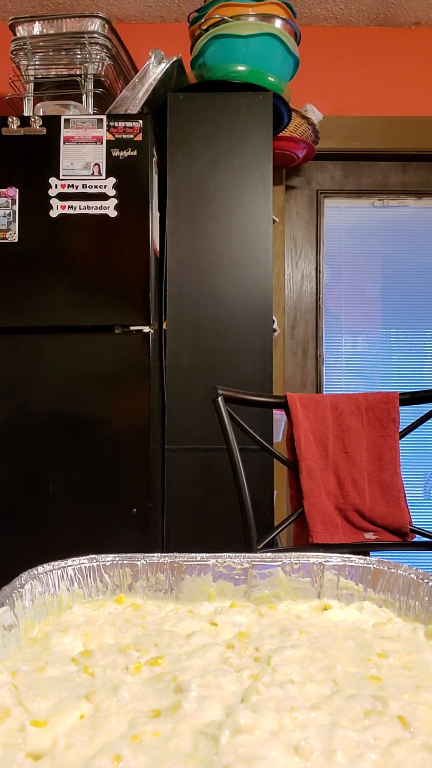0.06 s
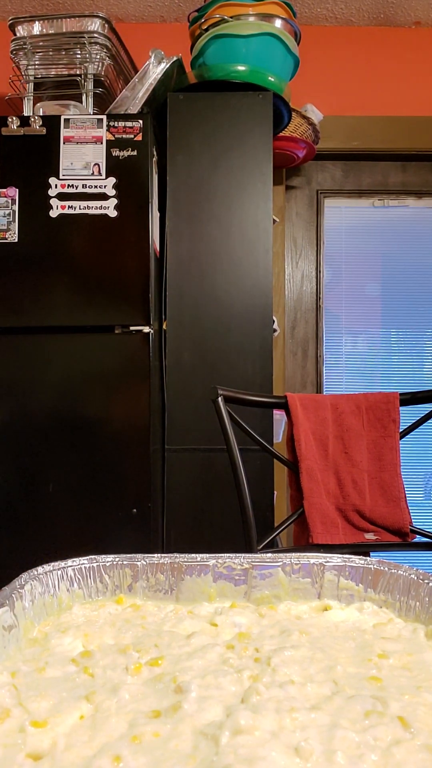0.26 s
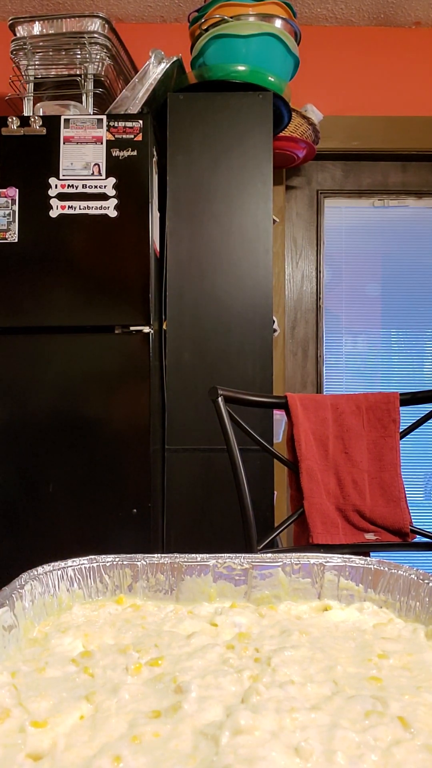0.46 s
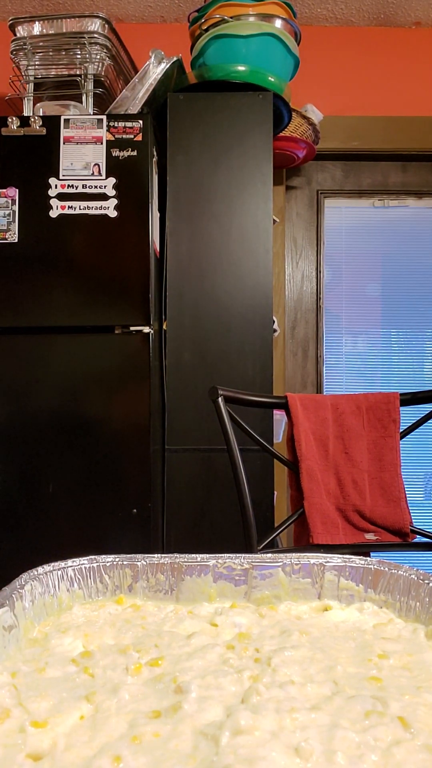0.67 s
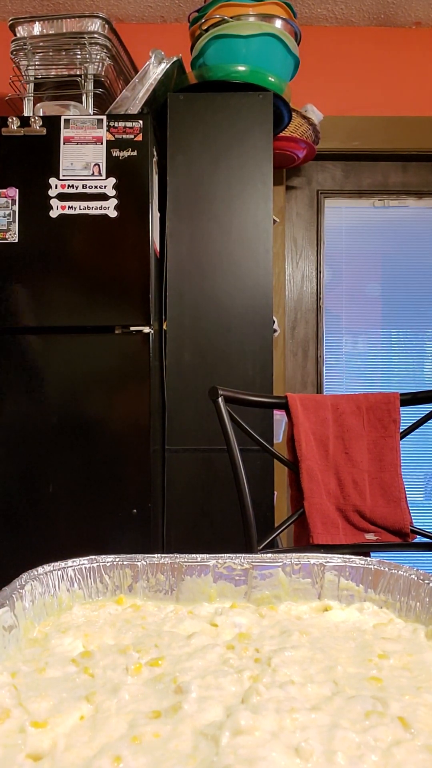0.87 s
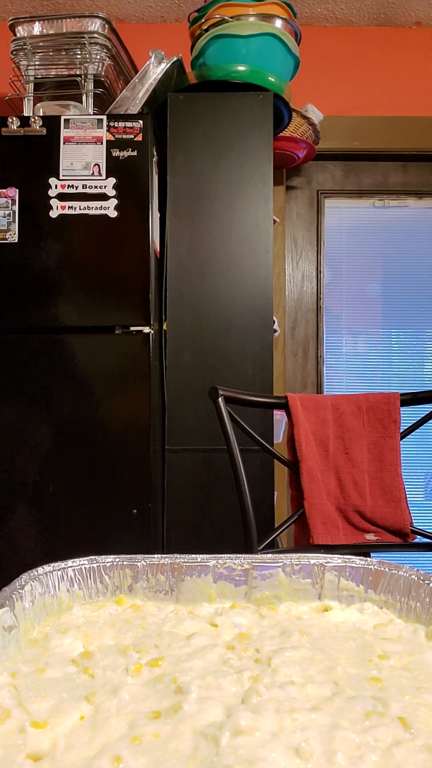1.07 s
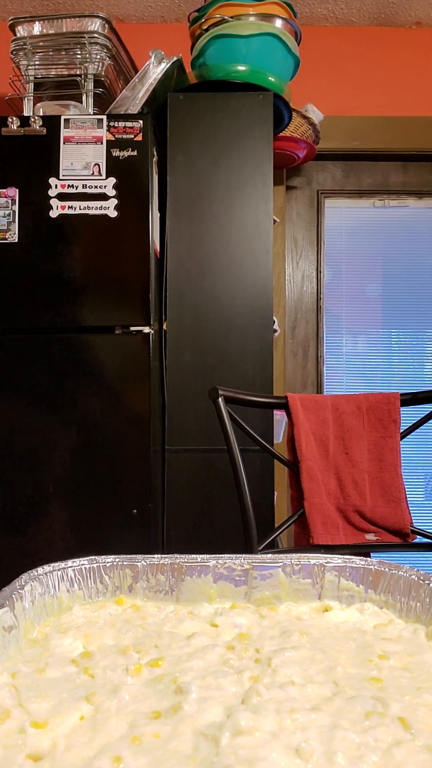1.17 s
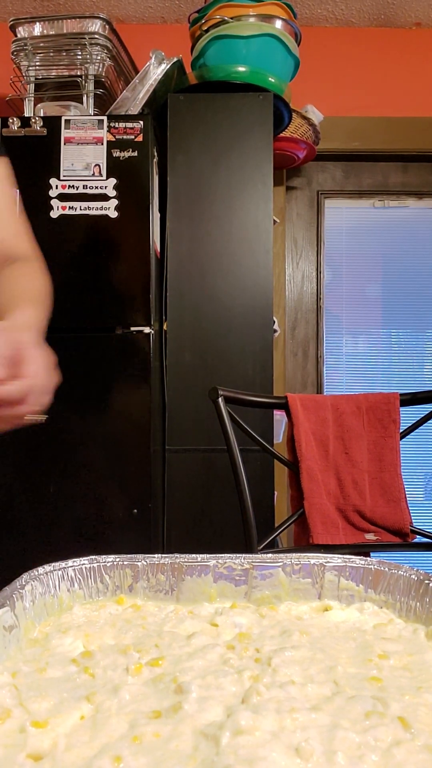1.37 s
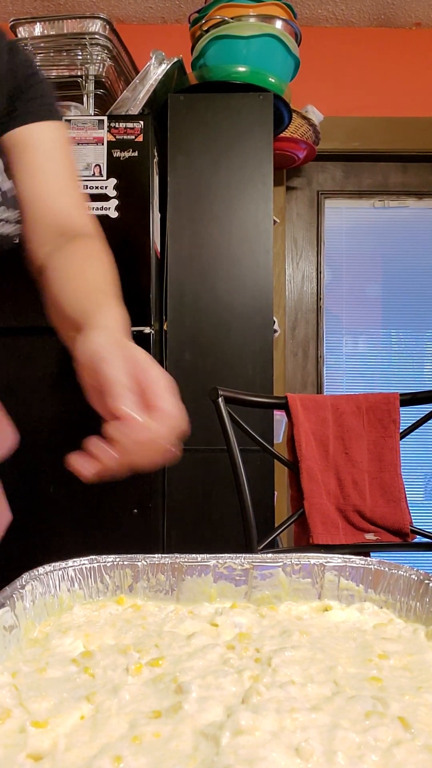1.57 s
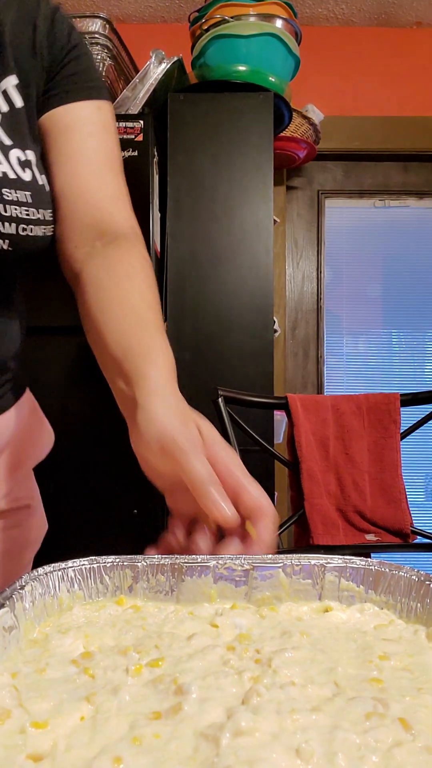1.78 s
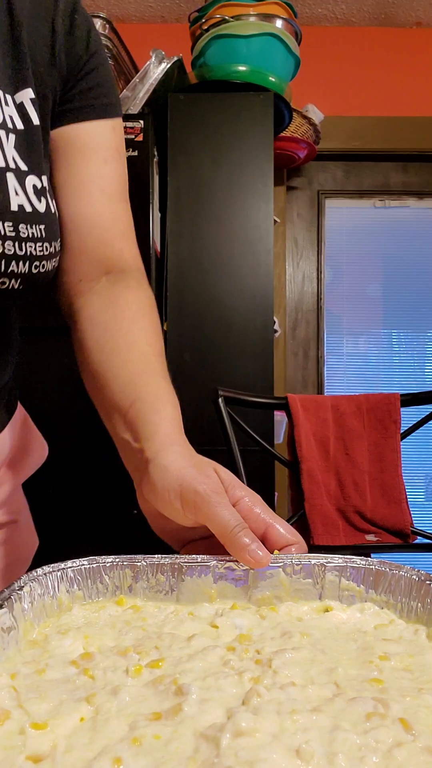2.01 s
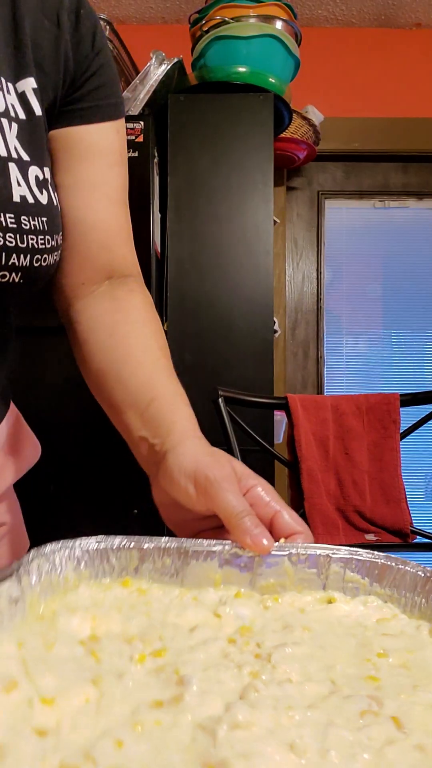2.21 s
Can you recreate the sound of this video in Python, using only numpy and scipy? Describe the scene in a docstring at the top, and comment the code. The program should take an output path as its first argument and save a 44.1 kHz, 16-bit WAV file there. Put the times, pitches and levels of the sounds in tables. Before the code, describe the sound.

A foil pan is set down with a loud crinkling clatter, then soft footsteps and finger taps

```python
"""Still kitchen air (coloured diffuse noise) and a brush of cloth (swelling grains) open the scene.
A foil pan is put down and shifted: blows ring its modes, creases snap in runs, rim and base scrape
and rumble as noise strokes, and metal clinks as decaying sines. Someone then walks up: soles tick and scuff
as contacts and grains, the floor thuds as gliding sines with rumble, and clothes rustle again.
Last, fingers rub (grains) and tap (pushes with rough tails) close to the two microphones."""
import sys
import numpy as np
from scipy import signal
from scipy.fft import rfft, irfft
from scipy.io import wavfile
from scipy.ndimage import uniform_filter1d

SR = 44100
rng = np.random.default_rng(int(sys.argv[2]) if len(sys.argv) > 2 else 0)


def output_pcm(signal):
    """Save a mono or channel-first signal as 16-bit PCM at the path in sys.argv[1].

    Samples are clipped to [-1, 1] before scaling.
    """
    pcm = np.clip(np.atleast_2d(signal).T, -1, 1) * 32767
    wavfile.write(sys.argv[1], SR, np.round(pcm).astype(np.int16))


N = 99225
TOP_HZ = 15900
STOP_SHAPE = 1.4  # exponent of a stroke's fall

# spectrum of a sole on the floor: f/Hz, level/dB
SOLE_SPECTRUM = [(50, -17), (200, -3), (450, -0.5), (900, -9), (2000, -14.5), (4000, -26.5), (8000, -51),
                 (16000, -50)]


def amp(db):
    """Decibels to gain."""
    return 10 ** (np.asarray(db) / 20)


def unit(x):
    """Scale to rms 1."""
    return x / np.sqrt(np.mean(x ** 2))


def along(table, hz):
    """Read a table on a log-frequency axis."""
    f, v = np.array(table).T
    return np.interp(np.log(hz + 1), np.log(f), v)


def bins():
    """Frequencies of the padded transform in Hz."""
    return np.fft.rfftfreq(2 * N, 1 / SR)


def colour(x, table, tilt_db_per_octave=0):
    """Minimum-phase filter of unit energy with the table's spectrum, tilted."""
    octaves = np.log2(np.clip(bins(), 500, TOP_HZ))
    gain = unit(amp(along(table, bins()) + tilt_db_per_octave * octaves))
    # fold the cepstrum to make the filter causal
    cepstrum = irfft(np.log(gain))
    cepstrum[1:N] *= 2
    cepstrum[N + 1:] = 0
    return irfft(rfft(x, 2 * N) * np.exp(rfft(cepstrum)))[..., :N]


def swell(start_s, rise_s, decay_s, shape=1):
    """Straight rise, then a fall: exponential for shape 1, stopping more firmly above that."""
    t = np.arange(N) / SR - start_s
    rise = np.clip(t / rise_s, 0, 1)
    return rise * np.exp(-(np.maximum(t - rise_s, 0) / decay_s) ** shape)


def strokes(table):
    """Level over time of a series of sliding movements."""
    return sum(amp(db) * swell(s, rise, decay, STOP_SHAPE) for s, db, rise, decay in table)


def grains(per_s, spread_db):
    """Random tiny snaps of uneven size, evened to a steady local level."""
    signs = (rng.random(N) < per_s / SR) * rng.choice([-1, 1], N)
    snaps = signs * amp(spread_db * np.minimum(rng.exponential(size=N), 4))
    power = np.abs(uniform_filter1d(snaps ** 2, size=500))
    return snaps / np.sqrt(power + 1e-6)


def crack(start_s, decay_s):
    """A brief rough contact: decaying random signs."""
    return swell(start_s, 1 / SR, decay_s) * rng.choice([-1, 1], N)


def touch(start_s, decay_s):
    """A clean push of a finger or sole, trailed by a little roughness."""
    rough_db = -3
    push = signal.unit_impulse(N, int(start_s * SR))
    # the push has about the energy of the full crack
    return np.sqrt(decay_s * SR / 2) * push + amp(rough_db) * crack(start_s, decay_s)


def ring(x, modes):
    """Excite decaying modes; the response has unit energy."""
    t = np.arange(SR) / SR
    response = sum(amp(db) * np.sin(2 * np.pi * hz * t) * np.exp(-np.log(1000) * t / t60)
                   for hz, db, t60 in modes)
    return signal.fftconvolve(x, response / np.linalg.norm(response))[:N]


def pan_lr(x, db):
    """Spread a sound over two channels, left minus right in dB."""
    return x * amp(np.array([[db], [-db]]) / 2)


def diffuse():
    """Noise from all sides: mid and side shares set the likeness of the two microphones."""
    # likeness of the two microphones: f/Hz, correlation
    likeness = [(60, 0.89), (290, 0.94), (640, 0.27), (1300, -0.41), (2200, 0.018), (3100, 0.025),
                (6000, -0.27)]
    c = np.clip(along(likeness, bins()), -.98, .98)
    noise = rfft(rng.standard_normal((2, N)), 2 * N)
    mid, side = noise * np.sqrt([(1 + c) / 2, (1 - c) / 2])
    return irfft(np.array([mid + side, mid - side]))[:, :N]


def room(x):
    """A weak direct path, dense early reflections and a short tail, even in colour."""
    # reverberation: f/Hz, t60/s
    room_t60 = [(100, .37), (600, .33), (3000, .25), (8000, .2), (16000, .185)]
    early_s, early_db = 0.0067, 7
    direct_db, right_lag_s = -8.5, .00038  # direct path relative to the unit-energy reflections
    hz, t, noise = signal.stft(diffuse(), SR, nperseg=256)
    fall = np.exp(-np.log(1000) * t / along(room_t60, hz)[:, None])
    fall = fall * (1 + amp(early_db) * np.exp(-t / early_s))
    paths = signal.istft(noise * fall, SR)[1][:, :SR]
    paths /= np.linalg.norm(paths, axis=1, keepdims=True)
    paths[0, 0] += amp(direct_db)
    paths[1, int(right_lag_s * SR)] += amp(direct_db)
    response = rfft(paths)
    response /= np.sqrt(uniform_filter1d(np.mean(abs(response) ** 2, axis=0), size=90))
    return signal.fftconvolve(x[None], irfft(response)[:, :SR // 2], axes=1)[:, :N]


def still_air():
    """Steady diffuse noise with the colour of the quiet kitchen."""
    # spectrum of the air: f/Hz, level/dB
    air_spectrum = [(25, -10.5), (52, 2), (100, -10), (240, -13), (550, -16.5), (1000, -29), (2500, -24),
                    (4000, -25.5), (7500, -33), (11000, -29), (15500, -28.5)]
    air_db = -66
    return amp(air_db) * colour(diffuse(), air_spectrum)


def clothes():
    """Fabric brushes: dense fibre snaps swell and stop."""
    # brushes: t/s, level/dB, rise/s, decay/s
    rustles = [(-0.02, -53.5, 0.014, 0.057), (1.01, -61.5, 0.025, .1), (1.124, -56, 0.044, 0.076),
               (1.20, -48.5, 0.027, 0.05), (1.29, -59.5, 0.016, 0.32), (1.569, -47.5, 0.024, 0.069),
               (1.70, -53.5, 0.034, 0.069), (1.888, -52, 0.021, 0.12), (1.999, -46.5, 0.044, 0.078),
               (2.11, -46, 0.046, 0.056)]
    # spectrum of the cloth: f/Hz, level/dB
    cloth_spectrum = [(100, 3), (600, -0.5), (1800, 3), (3000, 0.5), (5000, -4.5), (7500, -15.5),
                      (11000, -10.5), (13500, -9), (15500, -1.5)]
    fibres_per_s, spread_db, side_db = 5600, -1.5, 2
    fibres = strokes(rustles) * grains(fibres_per_s, spread_db)
    return pan_lr(room(colour(fibres, cloth_spectrum)), side_db)


def blow(start_s):
    """One hard push and a brief rattle of the sheet."""
    push_db, rattle_db, rattle_decay_s = 20, -6, 0.0085
    push = amp(push_db) * signal.unit_impulse(N, int(start_s * SR))
    return push + amp(rattle_db) * crack(start_s, rattle_decay_s)


def foil_pan(place, count):
    """One part of the pan: its share of blows rings the body, creases snap in runs, the rim scrapes."""
    # blows: t/s, level/dB
    knocks = [(0.2205, -30.5), (0.2254, -12), (0.2305, -10.5), (0.242, -7.5), (0.246, -24), (0.260, -14),
              (0.290, -18), (0.304, -24), (0.346, -15.5), (0.353, -12.5), (0.368, -16), (0.379, -16),
              (0.408, -18.5), (0.445, -36), (0.481, -22.5), (0.662, -27), (0.692, -32.5), (0.711, -24),
              (0.785, -31.5)]
    # spectrum of a blow: f/Hz, level/dB
    knock_spectrum = [(40, -33.5), (90, -11.5), (150, -0.5), (250, -2), (335, -7.5), (430, 1), (540, -7.5),
                      (640, 3), (770, 0), (950, -9.5), (1500, -7), (2600, -10), (4000, -17.5),
                      (7500, -27.5), (16000, -23)]
    # modes of the pan: f/Hz, level/dB, t60/s
    pan_modes = [(150, -3, .15), (188, -2, .2), (232, -3, .38), (305, -2, .25), (375, -2, .2),
                 (424, -1, .25), (593, -2, .4), (654, -1, .22), (718, 1, .22), (784, 0, .22),
                 (1118, -7, .25), (1683, -7, .18), (2057, -5, .22), (2954, -7, .2)]
    # runs of buckling creases: t/s, level/dB, rise/s, decay/s, tilt/(dB/octave)
    crinkles = [(0.222, -18.5, .004, 0.038, 2.5), (0.296, -14.5, .007, 0.024, 1.5),
                (0.435, -27, 0.0043, 0.052, -1.5), (0.453, -21.5, .018, 0.046, 1),
                (0.526, -29, 0.044, 0.1, 2), (0.656, -41.5, .008, 0.12, -1),
                (0.6873, -14.5, .001, 0.019, 3.5), (0.698, -28.5, .01, 0.042, -2.5),
                (0.762, -35, 0.028, 0.012, 0)]
    # spectrum of the creases: f/Hz, level/dB
    foil_spectrum = [(100, -30.5), (500, -3), (1200, 2.5), (1900, 3), (2500, 6.5), (3600, 0.5), (4600, 2.5),
                     (7000, -6.5), (9000, -3), (12000, -3), (15500, -1.5)]
    # rim scrapes: t/s, level/dB, rise/s, decay/s
    scrapes = [(0.436, -22.5, 0.0027, 0.014), (0.56, -44, 0.017, 0.026), (0.694, -39, 0.012, 0.015)]
    # resonances of the rim: f/Hz, level/dB, t60/s
    rim_modes = [(2420, -8, 0.014), (2660, -13.5, 0.014), (3023, -11.5, 0.18), (3010, -4.5, .03)]
    ring_db, creases_per_s, spread_db = -8, 700, 5.5

    blows = sum(amp(db) * blow(s) for s, db in knocks[place::count])
    body = colour(blows, knock_spectrum) + amp(ring_db) * ring(blows, pan_modes)
    snaps = grains(creases_per_s, spread_db)
    creases = 0
    for s, db, rise, decay, tilt in crinkles:
        run = snaps * swell(s, rise, decay, STOP_SHAPE)
        creases = creases + amp(db) * colour(run, foil_spectrum, tilt)
    rim = ring(strokes(scrapes) * grains(creases_per_s, spread_db), rim_modes)
    return body + (creases + rim) / np.sqrt(count)


def pan_drag():
    """The base rumbles over the counter: low noise in slow strokes."""
    # drags: t/s, level/dB, rise/s, decay/s
    drags = [(0.48, -43, 0.031, 0.11), (0.585, -42.5, 0.023, 0.088), (0.69, -44.5, 0.0088, 0.057)]
    # spectrum of the dragging: f/Hz, level/dB
    drag_spectrum = [(25, -23), (55, 3.5), (130, 4), (225, 3.5), (330, -16), (600, -17), (1500, -25.5),
                     (16000, -71.5)]
    return colour(strokes(drags) * rng.standard_normal(N), drag_spectrum)


def whole_pan(count):
    """Each part of the pan reaches the microphones by its own paths; the drag is added alike to both."""
    return sum(room(foil_pan(place, count)) for place in range(count)) + pan_drag()


def clink():
    """Metal is touched twice and rings in high modes; each microphone gets its own phase."""
    # metal contacts: t/s, level/dB
    clinks = [(0.691, -32.5), (0.7095, -22.5)]
    # modes of the metal: f/Hz, level/dB, t60/s
    metal_modes = [(4522, 0, .19), (4529, -18, .33), (4290, -11, .08), (9420, -11, .06), (12620, -13, .14),
                   (12760, -10, .16), (13020, -13, .14), (13360, -13, .09), (15400, -13, .1)]
    t = np.arange(N) / SR
    notes = 0
    for s, db in clinks:
        for hz, mode_db, t60 in metal_modes:
            phase_turns = rng.random() + rng.random((2, 1)) / 4
            note = swell(s, .001, t60 / np.log(1000)) * np.sin(2 * np.pi * (hz * t + phase_turns))
            notes = notes + amp(db + mode_db) * note
    return pan_lr(notes, 5.4)


def step_ticks():
    """Floor and soles tick under the weight: short dry contacts, partly through the room."""
    # ticks: t/s, level/dB, decay/s, tilt/(dB/octave)
    tick_table = [(1.131, -58, 0.0037, 5.5), (1.203, -43, .003, 0), (1.234, -44, 0.0037, 1),
                  (1.301, -49, 0.0056, 4), (1.362, -49, 0.0018, -1), (1.5711, -38.5, 0.0017, -2.5),
                  (1.577, -44.5, 0.0041, -9.5), (1.595, -47.5, 0.0044, -1), (1.645, -43.5, 0.0028, -5),
                  (1.702, -44.5, 0.0039, -2), (1.729, -44, 0.0032, -6.5), (1.8904, -39.5, 0.003, -1),
                  (1.91, -47, 0.01, -2), (1.945, -44.5, 0.0025, 3.5), (1.964, -46, 0.004, -2)]
    side_db, room_db = -1.7, -3
    ticks = sum(amp(db) * colour(touch(s, decay), SOLE_SPECTRUM, tilt)
                for s, db, decay, tilt in tick_table)
    return pan_lr(ticks, side_db) + amp(room_db) * room(ticks)


def footsteps():
    """Footfalls load the floor: it thuds at a pitch that follows the push, and rumbles; soles scuff."""
    # footfalls: t/s, level/dB, f/Hz at the middle of the glide, rise/s, decay/s
    thud_table = [(1.199, -27.5, 109.3, 0.011, 0.015), (1.216, -35.5, 52.5, 0.015, 0.071),
                  (1.348, -51.5, 56.6, 0.0082, 0.087), (1.569, -46, 133.6, 0.0052, 0.042),
                  (1.619, -38.5, 49.6, 0.024, 0.081), (1.798, -45.5, 109.5, 0.024, 0.11),
                  (1.888, -37.5, 129.2, 0.0096, 0.093), (1.935, -32, 74, 0.031, 0.016),
                  (2.059, -35, 66, 0.0068, 0.027), (2.11, -47, 116.3, 0.048, 0.15)]
    # spectrum of the floor's rumble: f/Hz, level/dB
    rumble_spectrum = [(20, -6.5), (50, 6), (130, 0.5), (220, -7), (400, -22), (1500, -31.5), (16000, -81)]
    # soles on the floor: t/s, level/dB, decay/s
    scuff_table = [(1.232, -49.5, 0.076), (1.302, -50.5, .015), (1.36, -48, 0.017), (1.418, -59, 0.18),
                   (1.571, -43.5, 0.028), (1.60, -51, 0.18), (1.814, -63.5, 0.08), (1.887, -46, 0.09),
                   (1.962, -66, 0.054), (2.132, -55, 0.18)]
    glide, rumble_db = 0.22, -5  # glide: pitch span as a fraction of f
    thud_side_db, scuff_side_db = -5, -0.68

    t, thuds, load = np.arange(N) / SR, 0, 0
    for s, db, hz, rise, decay in thud_table:
        push = swell(s, rise, decay)
        pitch_hz = (t > s) * hz * (1 + glide * (push - .5))
        thuds = thuds + amp(db) * push * np.sin(2 * np.pi * np.cumsum(pitch_hz) / SR)
        load = load + amp(db) * push
    rumble = amp(rumble_db) * colour(load * rng.standard_normal(N), rumble_spectrum)
    scuff_level = sum(amp(db) * swell(s, .002, decay) for s, db, decay in scuff_table)
    scuffs = colour(scuff_level * grains(1500, 4.7), SOLE_SPECTRUM)
    return pan_lr(thuds + rumble, thud_side_db) + pan_lr(room(scuffs), scuff_side_db)


def fingers():
    """Light rubbing and short taps right by the microphones; the taps also excite the room."""
    # rubs: t/s, level/dB, rise/s, decay/s
    rubs = [(2.03, -50.5, 0.065, 0.13), (2.115, -57, 0.028, 0.02)]
    # spectrum of the rubbing: f/Hz, level/dB
    rub_spectrum = [(100, -9), (1000, -9), (3000, -0.5), (4200, -1), (5600, -2.5), (7500, -10), (11000, -6),
                    (15500, -2)]
    # taps: t/s, level/dB, decay/s, tilt/(dB/octave)
    tap_table = [(2.0581, -31.5, 0.0011, 2), (2.0648, -34.5, 0.0027, -1), (2.0667, -33, 0.0014, 0),
                 (2.0690, -31.5, 0.0024, -1.5), (2.0838, -41.5, 0.0018, 0), (2.1652, -37, 0.0021, 0),
                 (2.184, -34.5, 0.00052, 1), (2.2193, -24.5, 0.00063, -3)]
    # spectrum of a tap: f/Hz, level/dB
    tap_spectrum = [(60, -10), (300, -5), (600, -1), (850, -2), (1150, 1), (1450, -2), (1950, -9),
                    (3000, -11), (4200, -22), (5600, -19), (8000, -33), (16000, -40)]
    rub_side_db, tap_side_db = -20.5, -9
    skin = np.array([grains(1400, 6.9), grains(1500, 2)])  # one texture per microphone
    rub = colour(strokes(rubs) * skin, rub_spectrum)
    taps = sum(amp(db) * colour(touch(s, decay), tap_spectrum, tilt) for s, db, decay, tilt in tap_table)
    return pan_lr(rub, rub_side_db) + pan_lr(taps, tap_side_db) + room(taps)


def scene():
    """All sources in the quiet kitchen."""
    return (still_air() + clothes() + whole_pan(count=3) + clink()
            + step_ticks() + footsteps() + fingers())


def record(dry):
    """The right microphone is duller than the left; the top is cut steeply."""
    # left minus right microphone: f/Hz, level/dB
    mic_balance = [(100, -2.5), (400, 0), (720, -5.5), (1200, -1), (2400, -1.5), (3600, 8.5), (5500, 1),
                   (8000, 12), (9000, 3), (11200, 7.5), (13000, 12.5), (15500, 33.5)]
    ratio = amp(along(mic_balance, bins()))
    # the two gains keep a constant summed power
    gains = np.array([ratio, np.ones_like(ratio)]) * np.sqrt(2 / (1 + ratio ** 2))
    heard = irfft(rfft(dry, 2 * N) * gains)[:, :N]
    top_cut = signal.ellip(10, .2, 70, TOP_HZ, fs=SR, output="sos")
    return signal.sosfilt(top_cut, heard)


dry = scene()
out = record(dry)
output_pcm(out)
```